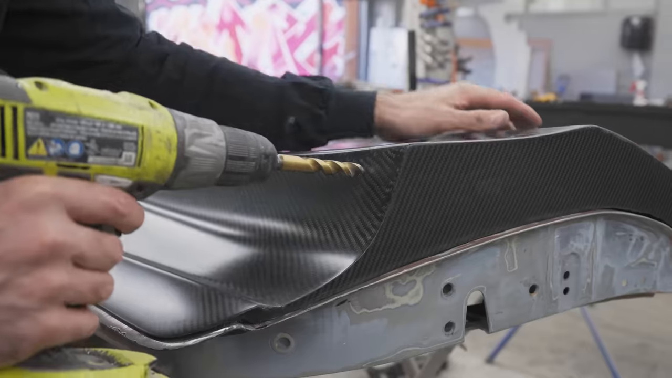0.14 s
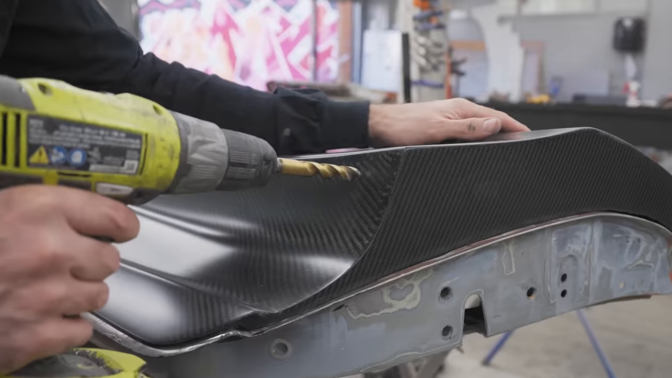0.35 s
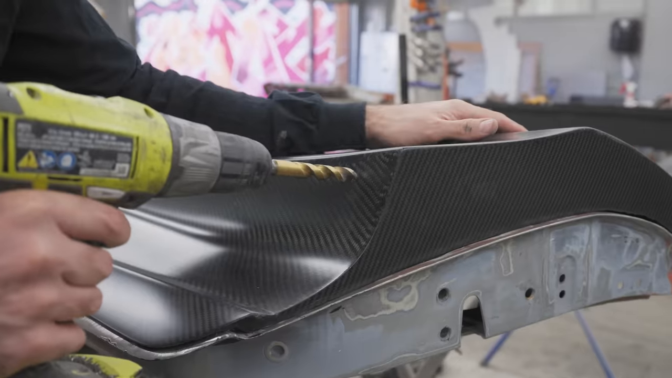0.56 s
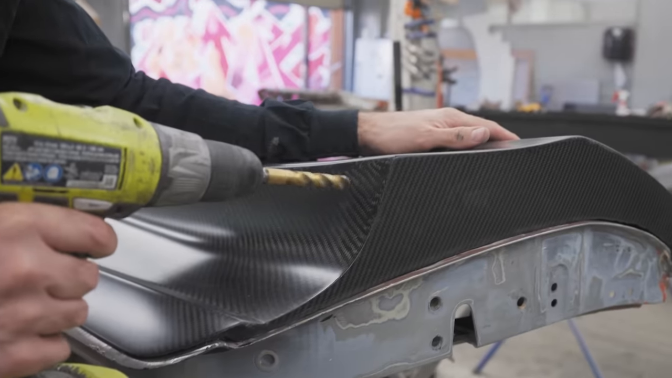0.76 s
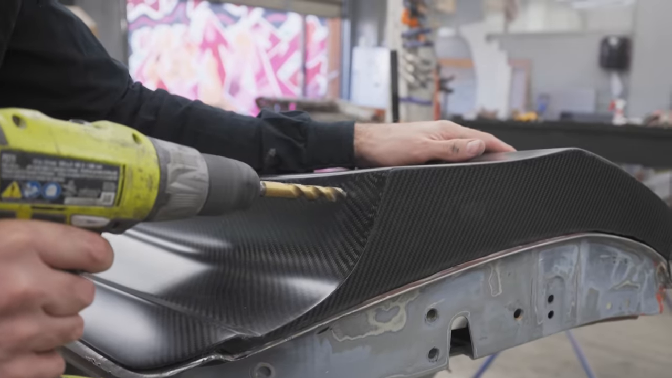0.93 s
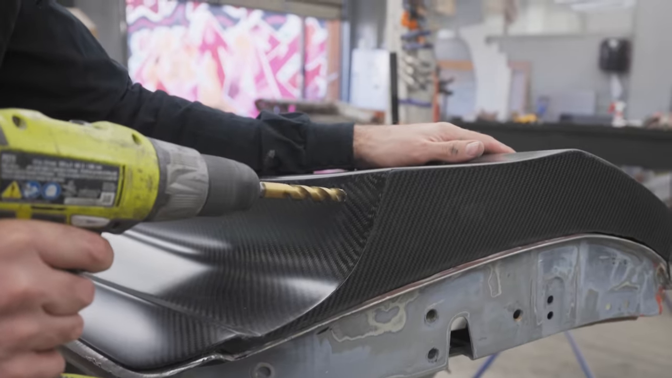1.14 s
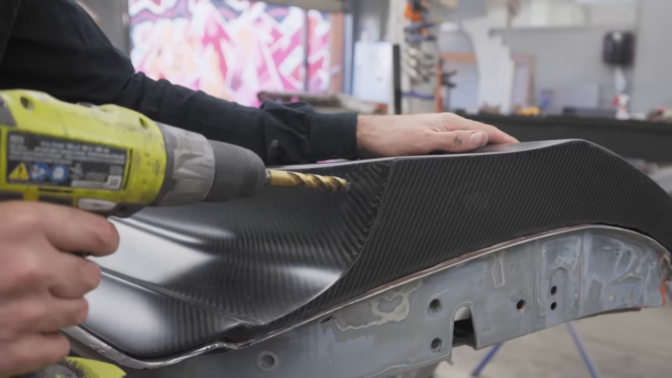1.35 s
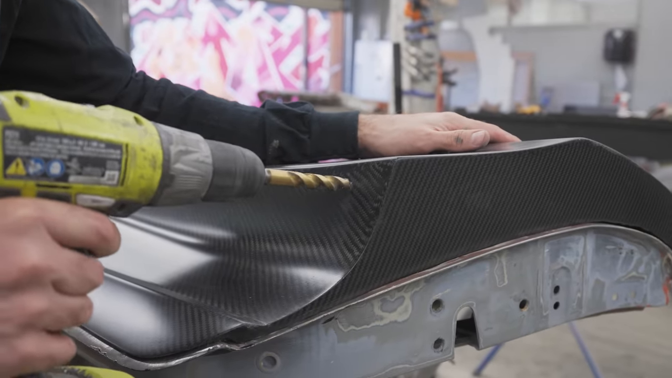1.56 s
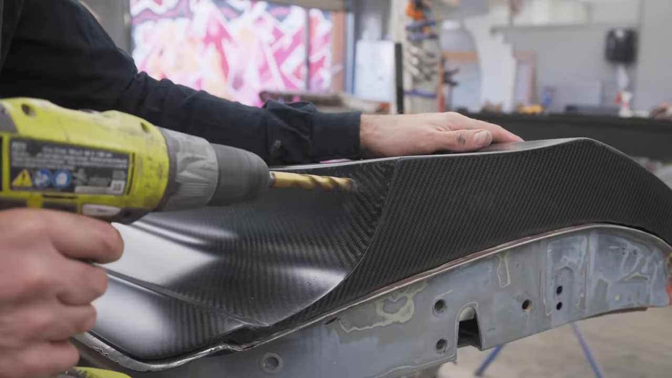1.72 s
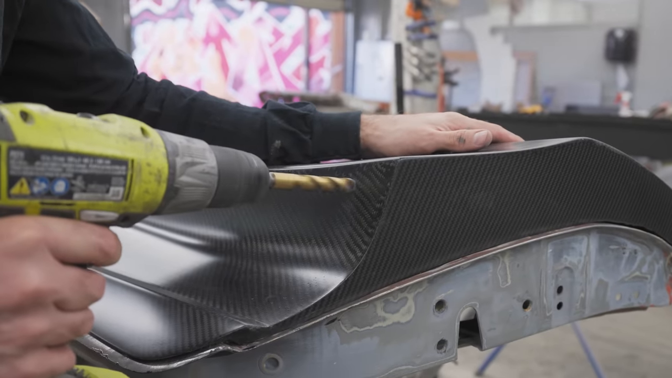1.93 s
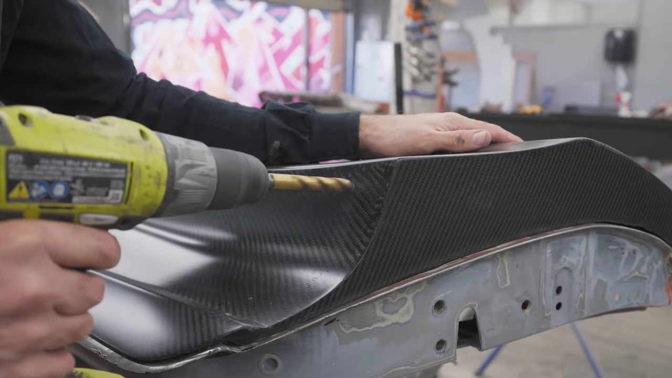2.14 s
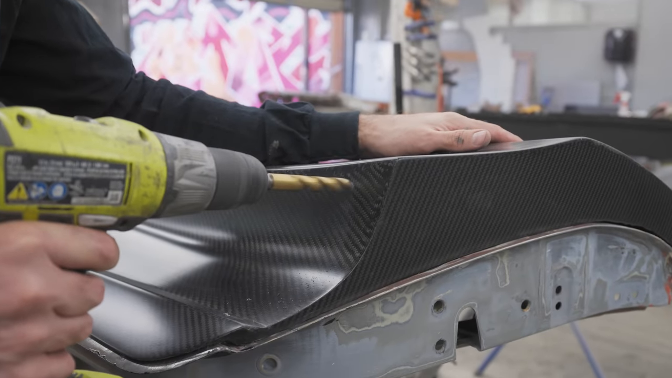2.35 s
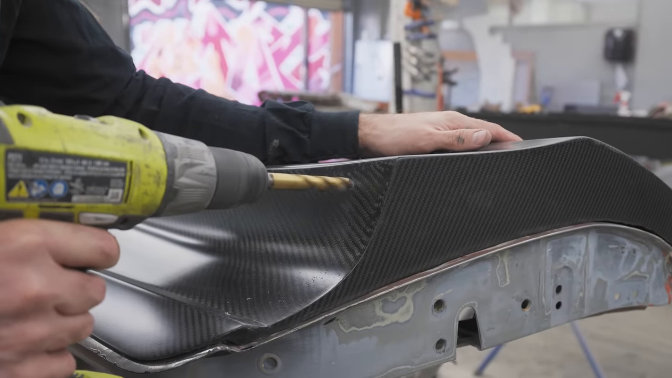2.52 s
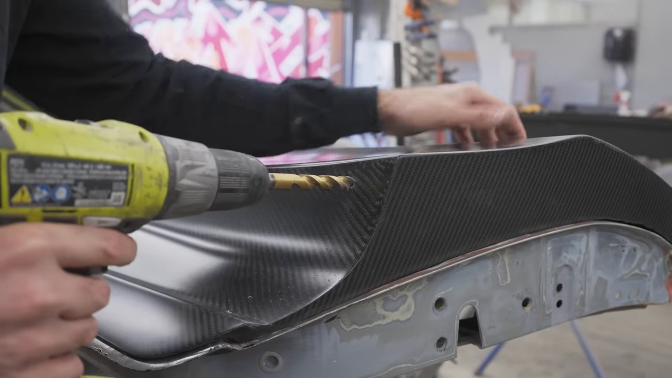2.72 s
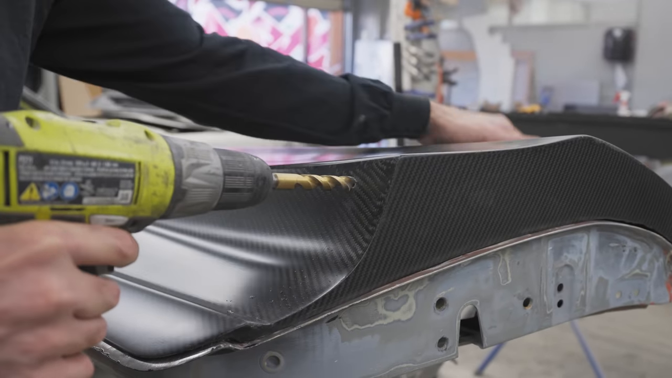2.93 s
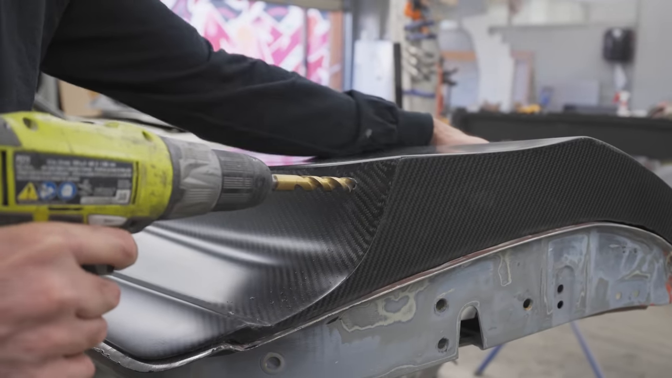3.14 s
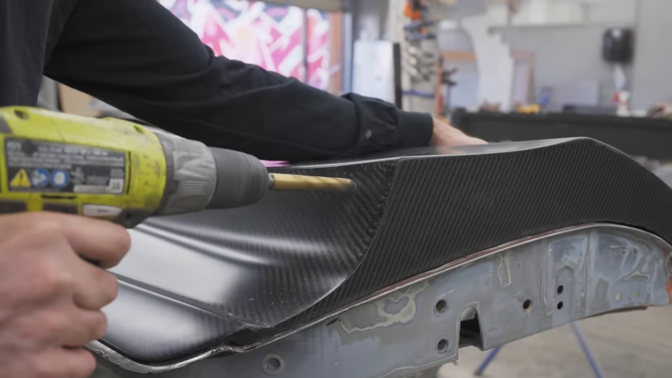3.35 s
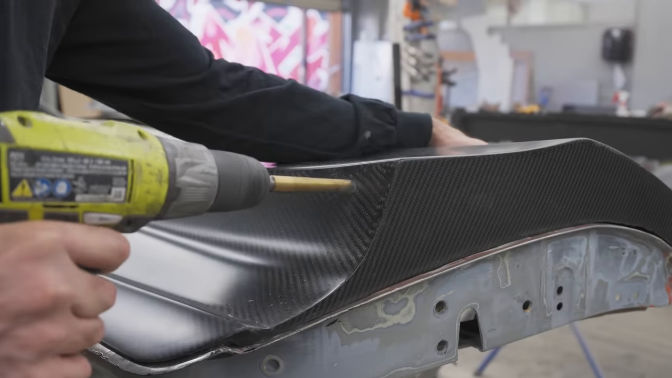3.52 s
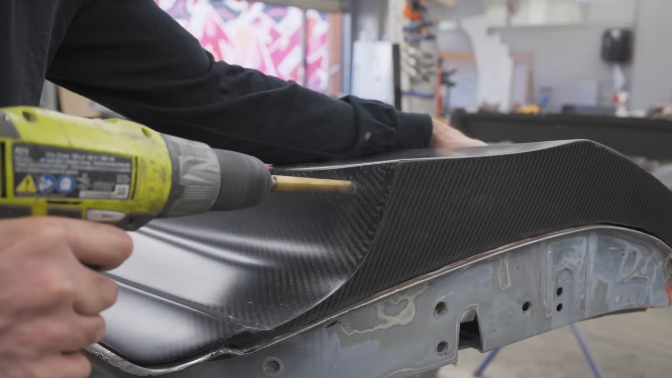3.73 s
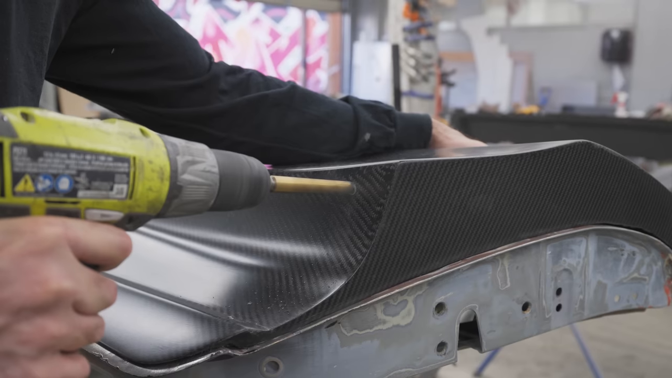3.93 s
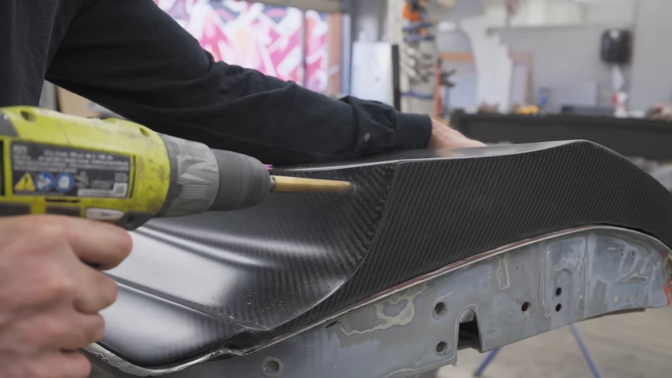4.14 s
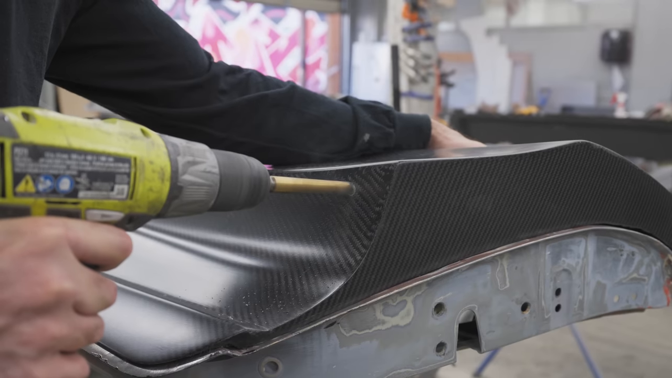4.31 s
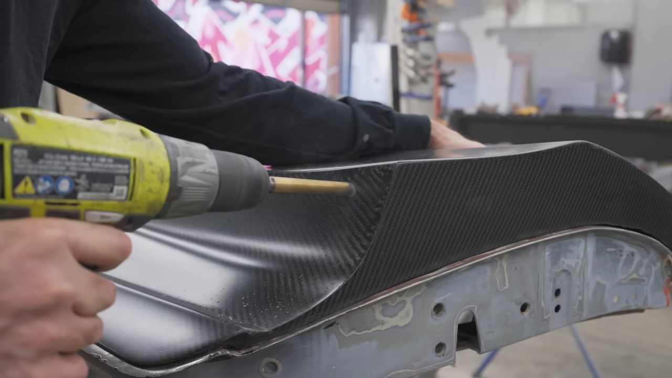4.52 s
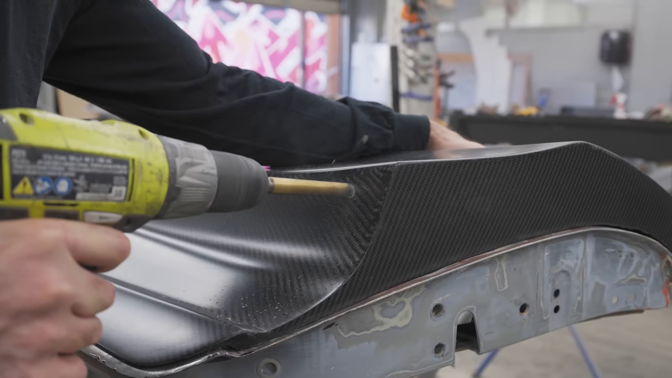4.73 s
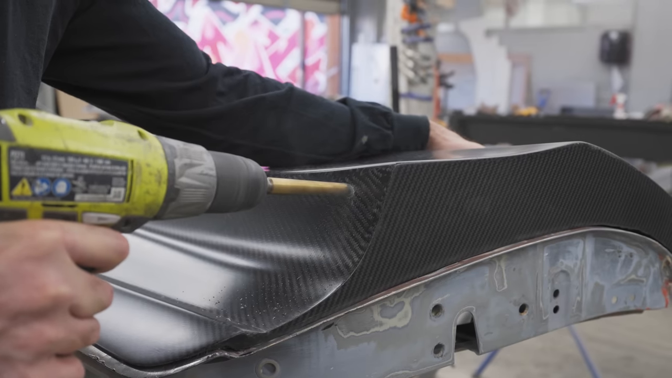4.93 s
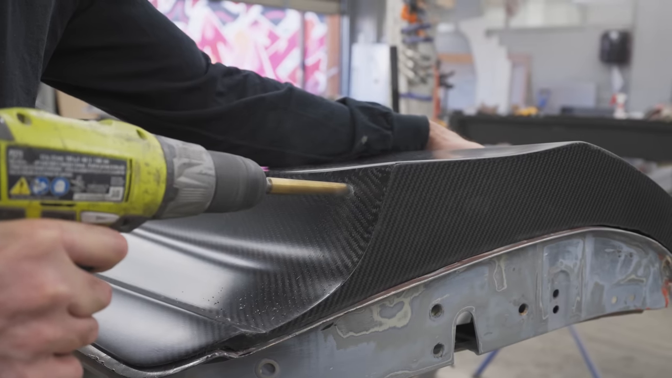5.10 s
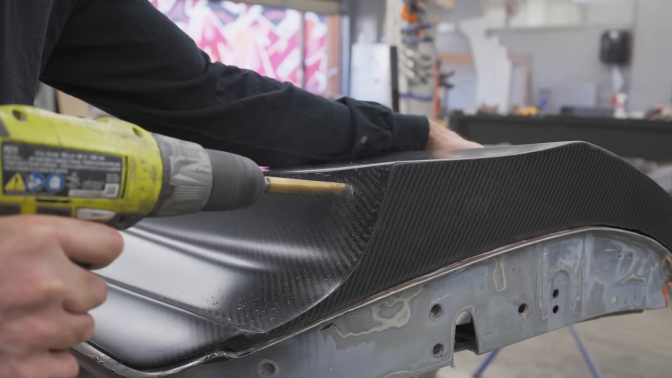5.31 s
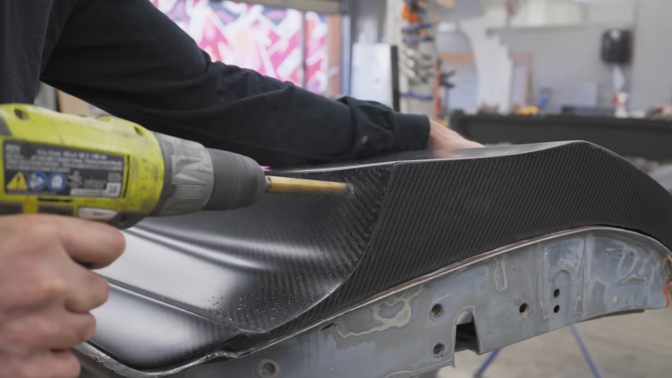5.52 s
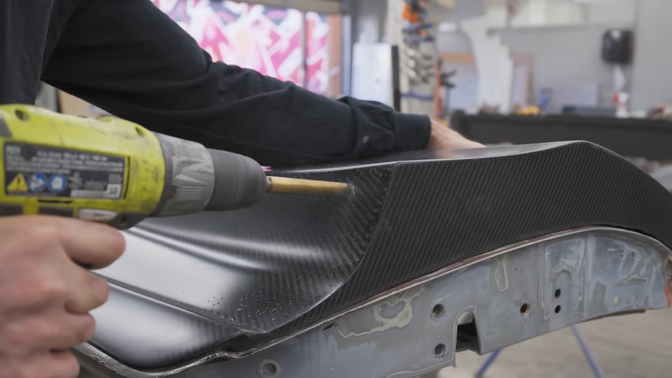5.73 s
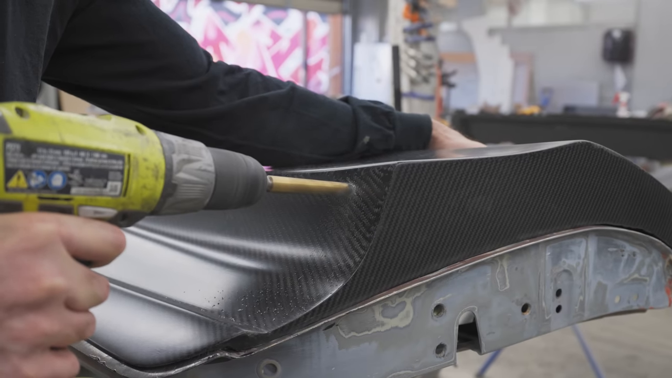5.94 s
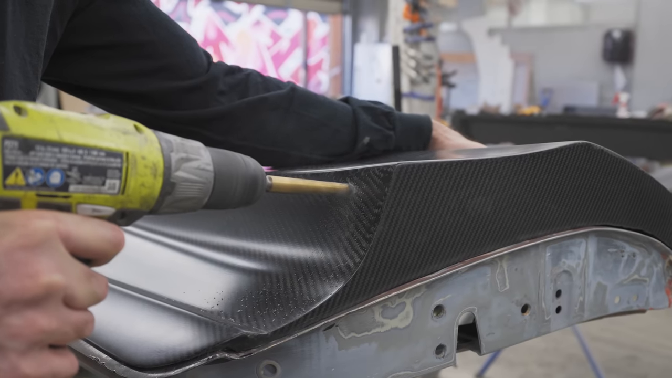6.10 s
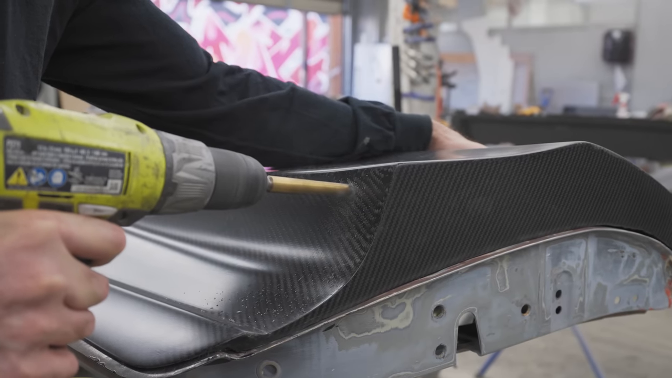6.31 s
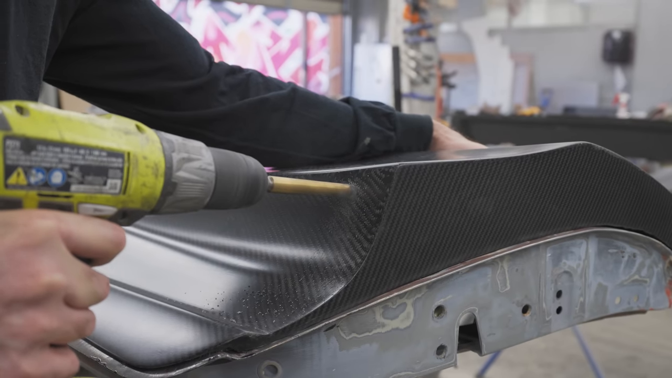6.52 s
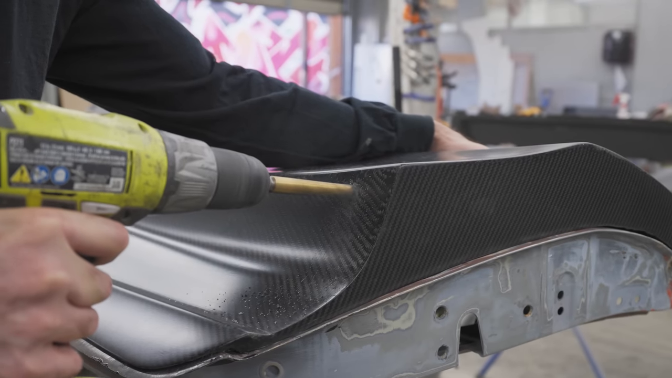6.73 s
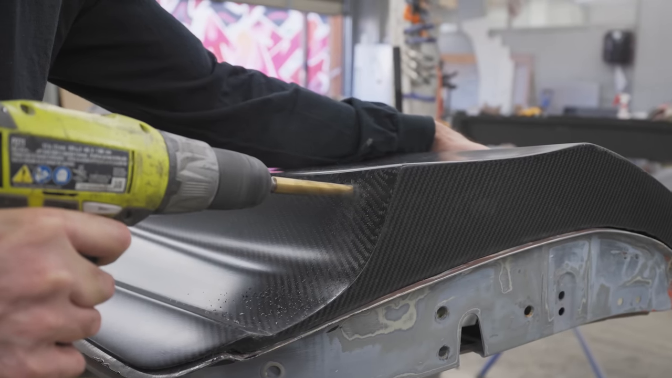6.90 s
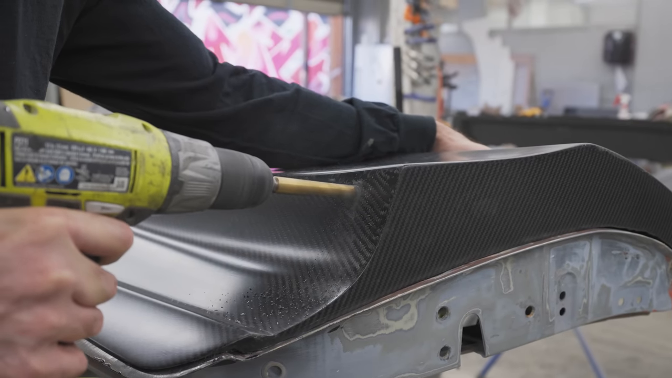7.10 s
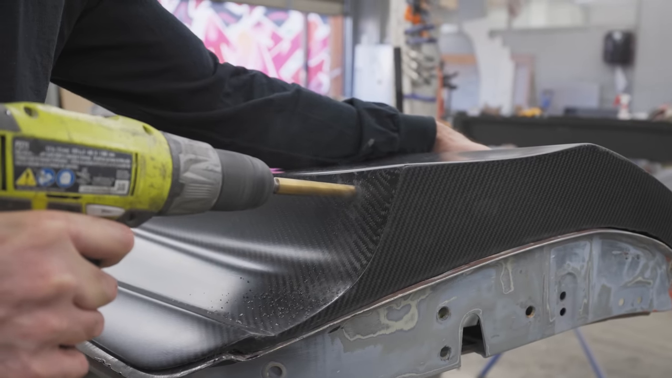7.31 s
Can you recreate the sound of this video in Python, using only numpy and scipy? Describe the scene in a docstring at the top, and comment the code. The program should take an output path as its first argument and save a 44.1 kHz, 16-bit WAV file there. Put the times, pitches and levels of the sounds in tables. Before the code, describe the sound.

Close to the microphone in a small workshop, a cordless drill turns slowly against a hard composite panel, its gears whining and bit snagging with rough rasps and clacks. Speed rises and falls, then drops almost to nothing with rattly clicks. After a sharp click it surges to full speed, a harsh rasp, hiss and hollow boom that gradually sags into chattering howl and drone. Dull rumble sits underneath.

```python
"""A cordless drill scrapes a composite panel at low speed, in a workshop and close to one microphone.
The trigger is feathered: current whistles, gears whine, the chuck clacks, and the bit snags in the fibres.
The bit slows almost to a standstill; after a sharp click the drill runs up to full speed.
Shaft harmonics then pass through resonances over noise-driven rasp, fizz and panel boom.
As the hole deepens the speed sags and the panel chatters, howls and drones at multiples of the chuck."""
import sys
import numpy as np
from scipy import signal
from scipy.fft import rfft, irfft
from scipy.io import wavfile

SR = 44100
rng = np.random.default_rng(int(sys.argv[2]) if len(sys.argv) > 2 else 0)


def dump_mix(stems):
    """Bounce the given channels to the path in sys.argv[1] as a 16-bit WAV at rate SR."""
    frames = np.atleast_2d(stems).T  # one column per channel
    limited = np.clip(frames, -1, 1)  # hard clip at full scale
    pcm = np.round(limited * 32767).astype(np.int16)
    wavfile.write(sys.argv[1], SR, pcm)


N = 328986
TIME = np.arange(N) / SR
FULL_SPEED = 290  # reference shaft speed, turns a second
REDUCTION = 13  # shaft turns for one turn of the chuck


def amp(db):
    """Logarithmic level: decibels to amplitude gain."""
    return 10 ** (np.asarray(db) / 20)


def unit(x):
    """Normalisation: scales a signal to rms 1."""
    return x / np.sqrt(np.mean(x ** 2) + 1e-20)


def curve(rows):
    """Linear interpolation: a timed two-column table, sample by sample."""
    times, values = np.transpose(rows)
    return np.interp(TIME, times, values)


def bout(start, end, rise, fall):
    """Trapezoidal envelope: swells, holds at one and dies away (all in s)."""
    return np.clip(np.minimum((TIME - start) / rise, (end - TIME) / fall), 0, 1)


def gate(start, end, fade):
    """Symmetric envelope: one between two times, with soft edges (all in s)."""
    return bout(start, end, fade, fade)


def wander(hz):
    """Low-passed noise: slow chance, rms 1, up to about hz changes a second."""
    spectrum = rfft(rng.standard_normal(N))
    low_pass = 1 / (1 + (np.fft.rfftfreq(N, 1 / SR) / hz) ** 4)
    return unit(irfft(spectrum * low_pass, N))


def colour(x, points, treble_db=0):
    """Minimum-phase filtering: a causal filter of given gain, tilted above 2 kHz (dB per decade)."""
    size = 4096
    hz, db = np.transpose(points)
    log_hz = np.log10(abs(np.fft.fftfreq(size, 1 / SR)) + 1)
    gain_db = np.maximum(np.interp(log_hz, np.log10(hz), db), -90)
    gain_db += treble_db * np.maximum(log_hz - np.log10(2000), 0)
    # the Hilbert transform of the log gain gives the phase of a causal filter
    response = np.exp(np.conj(signal.hilbert(np.log(amp(gain_db)))))
    taps = np.fft.ifft(response).real[:size // 2]
    return signal.oaconvolve(x, taps)[:len(x)]


def ring(x, hz, width):
    """Resonance: one second-order mode with its centre and bandwidth in Hz."""
    return signal.lfilter(*signal.iirpeak(hz, hz / width, fs=SR), x)


def grit(per_s, spread_db, smooth):
    """Shot noise of snapping fibres: sparse clicks of uneven size over a smooth rub."""
    struck = rng.random(N) < per_s / SR
    signs = rng.choice([-1, 1], N)
    sizes = amp(spread_db * np.minimum(rng.exponential(1, N), 4))
    return unit(unit(struck * signs * sizes) + smooth * rng.standard_normal(N))


def tone(phase, db, drift_db):
    """Modulated sinusoid: a machine tone, set by rms level, that drifts slowly and trembles a little."""
    tremble_db, jitter = 1.5 * wander(22), 0.28 * wander(45)
    return np.sqrt(2) * amp(db + drift_db * wander(5.2) + tremble_db) * np.sin(phase + jitter)


def level(speed, feed_db, full_db, db_per_decade, feed_share):
    """Power law: a layer of the cut grows with the speed of the bit and the push behind it."""
    return full_db + db_per_decade * np.log10(speed / FULL_SPEED) + feed_share * feed_db


def linger(db, db_per_s):
    """Peak following: follows a level up at once, and down no faster than the given rate."""
    return np.maximum.accumulate(db + db_per_s * TIME) - db_per_s * TIME


# spectrum of the shop's rumble: pitch_hz, relative gain_db
SHOP_SPECTRUM = [(12, -56), (20, -52), (37, -13), (86, -2), (142, -13), (177, -8.5), (270, -13), (301, -15),
                 (377, -19), (513, -43), (558, -23), (607, -27), (759, -29.5), (4060, -50), (16000, -68.5)]


def shop_rumble():
    """Stationary noise: the shop's background is random noise shaped by a fixed spectrum."""
    return amp(-32.5) * unit(colour(rng.standard_normal(N), SHOP_SPECTRUM))


# shaft while the trigger is feathered, let go and pulled again: time_s, speed in turns a second
FEATHERED_SPEED = [(0, 60), (.72, 46), (.8, 140), (1.13, 212), (1.28, 201), (1.52, 138), (1.75, 135),
                   (2.08, 222), (2.4, 255), (2.62, 318), (2.66, 290), (2.7, 25), (2.85, 16), (3.3, 20),
                   (3.37, 225)]
# shaft at full trigger, topping out and then sagging as the hole deepens: time_s, speed in turns a second
FULL_TRIGGER_SPEED = [(3.48, 279), (3.53, 288), (3.64, 294.5), (3.88, 297.4), (4.35, 297.4), (4.78, 294.1),
                      (5.4, 291.4), (6.1, 287.8), (7.46, 282.5)]


def shaft_speed():
    """Kinematics: the speed of the motor shaft sets every pitch that is locked to rotation."""
    return curve(list(FEATHERED_SPEED) + list(FULL_TRIGGER_SPEED))


# how hard the bit is pressed into the panel: time_s, relative push_db
PUSH = [(0, -16.5), (.04, -11), (.4, -18), (.7, -15.5), (.87, -13), (1.1, -15), (1.5, -10.5), (1.63, -12),
        (1.78, -6), (1.88, -8), (2.64, -7.5), (2.9, -14), (3.28, -9.5), (3.38, -2.5), (4.3, .5),
        (5.2, -1.5), (6.2, -0.5), (7.46, 0.5)]


def feed():
    """Contact force: the push behind the bit, in dB, drives the layers of the cut."""
    return curve(PUSH)


# spectrum of the rasp: pitch_hz, relative gain_db
RASP_SPECTRUM = [(350, -28.5), (600, 1), (657, -4), (902, -7.5), (1230, -5), (1450, -3), (1930, -8),
                 (2230, -8.5), (2590, -2), (3280, -14), (4260, -7.5), (4830, -16), (5530, -11), (6330, -18),
                 (9000, -23.5), (11700, -24), (19800, -120)]
# rings of the bit and gear case: pitch_hz, width_hz, level_db relative to the rasp
CASE_RINGS = [(1485, 370, -14), (1744, 160, -22), (3080, 320, -16), (3530, 140, -34), (4440, 350, -26)]
# spectrum of the dust fizz: pitch_hz, relative gain_db
FIZZ_SPECTRUM = [(3820, -0.5), (6500, 0), (8560, -3), (9300, -5), (12600, -9.5), (15100, -11.5),
                 (16000, -6)]
# spectrum of the panel boom: pitch_hz, relative gain_db
PANEL_SPECTRUM = [(71, -35), (120, -9), (184, -10), (216, -10.5), (247, -2.5), (263, -8), (314, 2.5),
                  (339, -4.5), (414, -2), (505, -7), (569, -9), (656, -17), (800, -30.5), (1040, -46.5),
                  (1760, -120)]
# narrow modes of the panel: pitch_hz, width_hz, level_db relative to the broad boom
NARROW_PANEL_MODES = [(276.5, 23, -9), (317, 14.4, -7.5), (408.6, 34, -7)]


def cutting(shaft, depth, rasp_db, fizz_db, boom_db):
    """Forced vibration: scraping in step with chuck and gears excites the bit, the dust and the panel."""
    chuck = shaft / REDUCTION
    pressure_db = 0.63 * np.cos(chuck) + 0.39 * np.cos(2 * chuck)
    pressure_db += 0.73 * wander(33) + 0.5 * wander(7.8)
    rattle_db = 0.067 * np.cos(shaft) + 1.0 * np.cos(2 * shaft)  # gears, in step with the motor

    scrape = grit(per_s=3500, spread_db=0.5, smooth=0.72) * amp(pressure_db + rattle_db)
    rasp = unit(colour(scrape, RASP_SPECTRUM))
    for hz, width, db in CASE_RINGS:
        rasp += amp(db + 5.2 * wander(0.37)) * unit(ring(scrape, hz, width))
    # the buried bit sings
    rasp += amp(-11.5) * depth ** 2 * unit(ring(scrape, hz=2570, width=150))

    # a slow bit tears single fibres, so its fizz comes in bursts
    bursts_db = 1.7 * gate(-1, 1.96, 0.1) * wander(35)
    dust = grit(per_s=3000, spread_db=3.0, smooth=1.0) * amp(pressure_db + rattle_db + bursts_db)
    fizz = unit(colour(dust, FIZZ_SPECTRUM))

    thuds = grit(per_s=900, spread_db=2.85, smooth=1.0) * amp(0.31 * pressure_db)
    broad_boom = unit(colour(thuds, PANEL_SPECTRUM))
    modes = sum(amp(db) * unit(ring(rng.standard_normal(N), hz, width))
                for hz, width, db in NARROW_PANEL_MODES)
    boom = unit(broad_boom + modes)
    sunk_boom_db = -3.5 * depth  # chatter takes over part of the boom
    return amp(rasp_db) * unit(rasp) + amp(fizz_db) * fizz + amp(boom_db + sunk_boom_db) * boom


# modes of the free bit while only its tip touches: pitch_hz, width_hz, relative level_db
BIT_MODES = [(1014, 310, 9.5), (1566, 39, 5), (1740, 65, -11), (2890, 100, 0), (3500, 62, 0),
             (4310, 79, -7), (5540, 120, -13), (6350, 73, -3), (7850, 350, -12), (10200, 330, -6),
             (13200, 1200, -8)]


def slow_tip(shaft, rasp_db):
    """Impulse excitation: at low speed the tip plucks fibres, strongest twice a turn, and the bit rings."""
    plucking_db = 2.0 * np.cos(2 * shaft / REDUCTION) + 4.5 * wander(37)
    plucks = grit(per_s=1100, spread_db=3.5, smooth=0.42) * amp(plucking_db)
    rings = sum(amp(db + 2 * wander(29.0)) * unit(ring(plucks, hz, width)) for hz, width, db in BIT_MODES)
    return amp(rasp_db - 3.5) * gate(-1, 2.5, 0.97) * unit(rings)


# loud motor and gear tones, each swelling as the sagging speed slides it through a resonance:
# order in multiples of the shaft, resonance_hz, width_hz, relative level_db at resonance
RESONANT_WHINES = [(5.8, 1708, 75, -32.5), (9, 2565, 185, -26), (11, 3280, 190, -33.5),
                   (12, 3600, 500, -28), (15, 4392, 130, -22.5), (29, 8540, 600, -41),
                   (31, 9200, 750, -36.5)]
# weaker motor tones: order in multiples of the shaft, relative level_db
WEAK_ORDERS = [(5, -44), (7, -46), (10, -37), (14, -49), (16, -42), (18, -47), (21, -51), (24, -51),
               (25, -47), (26, -48), (27, -51), (30, -44), (32, -51), (33, -40), (35, -56), (36, -52),
               (38, -56), (40, -62), (48, -60), (51, -60)]
# hiss of the brushes: pitch_hz, width_hz, level_db at the reference speed, slope in dB per tenfold speed
BRUSH_NOISE = (9591, 1100, -42, 97)


def motor(shaft, speed, feed_db):
    """Order tones and resonance: shaft harmonics, the mesh of the first gear stage, and brush hiss."""
    pace = speed / FULL_SPEED
    load = pace * amp(feed_db)
    full = gate(3.44, 8, 0.1)  # full trigger
    loud = np.zeros(N)
    for order, hz, width, db in RESONANT_WHINES:
        detuning = 2 * (order * speed - hz) / width
        loud += tone(order * shaft, db, drift_db=0.3) / (1 + detuning ** 2)
    weak = sum(tone(order * shaft, db + 4.5, drift_db=1.5) for order, db in WEAK_ORDERS)

    mesh_phase = 5.8 * shaft
    # the mesh is weaker at full trigger
    mesh_db = -35.5 - 10 * full + 0.4 * feed_db + 2 * wander(17)
    mesh = tone(mesh_phase + 0.5 * wander(30), mesh_db, drift_db=1.5)
    # at part speed the loosely loaded teeth also rattle at multiples of the mesh
    rattle = sum(tone(k * mesh_phase + 1.3 * wander(25), -39 - 2.7 * k, drift_db=2.5) for k in range(2, 6))
    gears = pace * (gate(0.7, 9, 0.35) * mesh + gate(0.68, 3.4, 0.4) * rattle)

    hz, width, hiss_db, speed_db = BRUSH_NOISE
    noise = unit(ring(ring(rng.standard_normal(N), hz, width), hz, width))
    hiss = amp(hiss_db + speed_db * np.log10(pace)) * noise
    return full * loud + np.maximum(full, 0.68 * load * pace) * weak + gears + hiss


# the flutes snag in the fibres: start_s, change of boom_db, change of fizz_db, length_s
FLUTE_SNAGS = [(0.012, -7, 8.5, .3), (0.843, 4.5, 5, 0.07), (.98, 1.5, 7, 0.075), (1.108, 8, 2, 0.041),
               (1.55, 0, -1, 0.061), (1.774, 8.5, 7, .06), (1.934, 4.5, 3, .06), (3.376, 3, 1.5, 0.12)]


def surges():
    """Transient loading: each snag changes boom and fizz, in dB, quickly and then dies away."""
    boom_db, fizz_db = np.zeros(N), np.zeros(N)
    rise_s = 0.027
    for start, boom, fizz, length in FLUTE_SNAGS:
        age = np.maximum(TIME - start, 0)
        shape = np.minimum(age / rise_s, 1) * np.exp(-(age / length) ** 2)
        boom_db += boom * shape
        fizz_db += fizz * shape
    return boom_db, fizz_db


# speed controller whistles: start_s, end_s, first_pitch_hz, last_pitch_hz, relative level_db
CONTROLLER_WHISTLES = [(.2, .43, 7620, 7660, -66), (.2, .43, 5430, 5380, -63), (.2, .45, 4790, 4770, -65),
                       (.46, .73, 6750, 6850, -65), (.7, .77, 5500, 6300, -55), (.74, 1.0, 6300, 6400, -55),
                       (1.0, 1.5, 6380, 6350, -56), (1.52, 1.72, 6380, 6220, -49.5),
                       (1.74, 2.0, 6190, 6350, -49), (3.11, 3.2, 6000, 5950, -62),
                       (3.19, 3.32, 5760, 5300, -61.5), (3.11, 3.19, 5000, 5070, -60)]


def controller():
    """Electromagnetic excitation: at part trigger the switched current makes the windings whistle."""
    out = np.zeros(N)
    for start, end, first_hz, last_hz, db in CONTROLLER_WHISTLES:
        hz = np.interp(TIME, [start, end], [first_hz, last_hz])
        phase = 2 * np.pi * np.cumsum(hz + 65 * wander(176)) / SR
        out += amp(db + 4.9 * wander(40)) * gate(start, end, 0.013) * np.sin(phase)
    return out


# clacks of the chuck and bit: start_s, peak level_db before the room,
# treble tilt in dB per decade above 2 kHz, rise_s, decay_s (to -60 dB)
CHUCK_CLACKS = [(.517, -29.5, 10, .0004, 0.02), (.745, -39, 14, 0.0026, .04), (.861, -19, 6, .001, .06),
                (1.742, -7.5, 37, 0.00074, .03), (1.79, -13, 20, 0.00091, .05),
                (2.642, -14, 1, 0.0012, 0.043), (2.671, -12.5, -6, 0.0012, 0.023),
                (2.708, -26, 8, .001, .04), (2.819, -27, 49, .0003, .012), (3.093, -33, 33, 0.0034, 0.079),
                (3.1215, -4, -35, 0.00013, 0.077), (3.127, -28.5, 29, .008, 0.095),
                (3.318, -7.5, 15, 0.00087, 0.041)]
# spectrum of a clack: pitch_hz, relative gain_db
CLACK_SPECTRUM = [(150, -19), (500, -7), (1000, -2), (2200, 0), (3300, -1.5), (4600, -16), (8000, -29),
                  (16000, -42)]


def clacks():
    """Impact: a blow and a short rattle in the housing; a slow rise turns it into a scuff."""
    out = np.zeros(N)
    t = TIME[:SR // 4]
    for start, db, treble_db, rise, decay in CHUCK_CLACKS:
        blow = 0.12 * rng.standard_normal(len(t)) * amp(-60 * t / decay) * (1 - np.exp(-t / rise))
        blow[0] += 2.4 * np.exp(-rise / 0.0011)  # a slow rise leaves little of the sharp blow
        sound = colour(blow, CLACK_SPECTRUM, treble_db)
        out[round(start * SR):][:len(t)] += amp(db) * sound / abs(sound).max()
    return out


# light pings of the bit on the panel: start_s, pitch_hz, peak level_db before the room, decay_s (to -60 dB)
BIT_PINGS = [(.518, 2620, -37, .035), (.742, 4880, -37, .06)]


def pings():
    """Free vibration: single touches of the bit, each an exponentially decaying ring."""
    out, t = np.zeros(N), TIME[:SR // 4]
    for start, hz, db, decay in BIT_PINGS:
        out[round(start * SR):][:len(t)] += amp(db - 60 * t / decay) * np.sin(2 * np.pi * hz * t)
    return out


# spectrum of the motor housing: pitch_hz, relative gain_db
HOUSING_SPECTRUM = [(600, -8), (1500, 3.5), (2900, -2.5), (4400, 1), (5000, -17), (6000, 1), (7000, -25),
                    (7800, -1.5), (8500, -13.5), (9500, -3), (10300, -12), (12000, -24), (14000, -20),
                    (16000, -4)]


def brushes(shaft, rasp_db):
    """Periodic excitation: the commutator repeats one uneven scratch every turn and rings the housing."""
    k = np.arange(513)
    # harmonics 3 to 65 of equal strength and random phase
    harmonics = np.exp(2j * np.pi * rng.random(len(k))) * (k > 2) * (k < 66)
    one_turn = irfft(harmonics)
    turns = (shaft + 0.008 * wander(60)) / (2 * np.pi)
    buzz = np.interp(turns % 1, np.linspace(0, 1, len(one_turn)), one_turn)
    masked_db = -7 * gate(3.6, 9, 0.3)  # under the full cut it stands out less
    return amp(rasp_db - 6 + masked_db) * gate(0.75, 9, 0.1) * unit(colour(buzz, HOUSING_SPECTRUM))


# fleeting tones of the shallow hole: order in multiples of the chuck, relative level_db
SHALLOW_TONES = [(10, -32), (12, -31), (16, -30), (18, -31), (20, -33)]
# bouts of the panel's howl: start_s, end_s, relative level_db
HOWL_BOUTS = [(3.888, 5.325, -19), (5.176, 5.914, -11.5), (5.77, 6.198, -17), (6.383, 7.447, -15.5)]
# tones of the drone: order in multiples of the chuck, relative level_db
DRONE_TONES = [(6, -1), (8, -4), (10, -4), (11, -8), (12, -10), (13, -10), (16, -9), (18, -6), (20, -11),
               (21, -13), (26, -13)]
# bouts of the low drone: start_s, end_s, rise_s, fall_s, relative level_db
DRONE_BOUTS = [(4.876, 7.2, 0.74, 0.3, -19.5), (7.09, 7.8, 0.089, .2, -16)]


def chatter(shaft):
    """Synchronous vibration: the flutes catch on every turn and shake the panel at chuck multiples."""
    chuck = shaft / REDUCTION
    # in the shallow hole the chatter hops between neighbouring even multiples
    hopping = sum(amp(db + 3 * wander(5)) * np.sin(order * chuck + 0.8 * wander(8))
                  for order, db in SHALLOW_TONES)
    hopping *= amp(5.5) * gate(3.36, 5.5, 0.094)

    howl = amp(1.2 * wander(5)) * np.sin(14 * chuck + wander(8) / 5)
    howl *= sum(amp(db) * gate(start, end, 0.15) for start, end, db in HOWL_BOUTS)

    drone = np.zeros(N)
    for order, db in DRONE_TONES:
        # each tone reaches the air by its own path through the panel, so their peaks do not line up
        path_phase = 2 * np.pi * rng.random() + 0.073 * wander(4.9)
        drone += amp(db + 0.98 * wander(5.3)) * np.sin(order * chuck + path_phase)
    drone *= sum(amp(db) * bout(start, end, rise, fall) for start, end, rise, fall, db in DRONE_BOUTS)
    return np.sqrt(2) * (drone + howl + hopping)


def workshop(x, wet_db, t60=0.65):
    """Reverberation: a short, dull, exponentially decaying tail from the walls, with little bass."""
    t = TIME[:SR // 2]
    tail = rng.standard_normal(len(t)) * amp(-60 * t / t60) * (t > 0.006)
    # pitch_hz, relative gain_db
    tail = colour(tail, [(130, -9.5), (320, -8.0), (800, 4.0), (2000, -7.0), (6000, -9.5), (15000, -13.5)])
    return x + amp(wet_db) * signal.oaconvolve(x, tail / np.linalg.norm(tail))[:N]


def scene():
    """Superposition: drill and panel in the room over the shop's rumble, the same in both ears."""
    speed, feed_db = shaft_speed(), feed()
    depth = np.clip((TIME - 2.9) / 4.4, 0, 1)  # sinks in from 2.9 s, over 4.4 s
    shaft = 2 * np.pi * np.cumsum(speed * (1 + 0.0003 * wander(9.5))) / SR  # phase in radians
    rasp_db = level(speed, feed_db, full_db=-17.5, db_per_decade=19.7, feed_share=1.174)
    fizz_db = level(speed, feed_db, full_db=-25, db_per_decade=23.6, feed_share=1)
    boom_db = level(speed, feed_db, full_db=-13.5, db_per_decade=18.6, feed_share=0.86)

    snag_boom_db, snag_fizz_db = surges()
    # the tip skates on the surface until it bites at 0.9 s; till then the panel booms less
    skating_db = -3.5 * gate(-1, 0.9, 0.1)
    # as the bit slows, the panel's boom dies no faster than this rate
    boom_db = linger(boom_db + snag_boom_db + skating_db, db_per_s=150)

    cut = cutting(shaft, depth, rasp_db, fizz_db + snag_fizz_db, boom_db)
    cut += slow_tip(shaft, rasp_db) + chatter(shaft)
    drill = motor(shaft, speed, feed_db) + controller() + brushes(shaft, rasp_db)
    mono = workshop(cut + drill + clacks() + pings(), wet_db=-18.5) + shop_rumble()
    return np.array([mono, mono])


def record(dry):
    """Dynamic compression: gain control holds down the loud cut, peaks are rounded, the band is limited."""
    threshold_db, ratio, listen_s, recover_db_per_s = -16.5, 4.06, 0.018, 24
    keep = np.exp(-1 / (listen_s * SR))
    power = signal.lfilter([1 - keep], [1, -keep], dry[0] ** 2)
    power_db = 10 * np.log10(power + 1e-12)
    over_db = np.maximum(linger(power_db, recover_db_per_s) - threshold_db, 0)
    held = dry * amp(-over_db * (1 - 1 / ratio))
    ceiling = 0.53  # of full scale
    rounded = held / (1 + (held / ceiling) ** 8) ** (1 / 8)
    low_pass = signal.firwin(511, 15750, window=("kaiser", 9), fs=SR)  # edge in Hz
    return signal.oaconvolve(rounded, low_pass[None], "same")


dry = scene()
out = record(dry)
dump_mix(out)
```